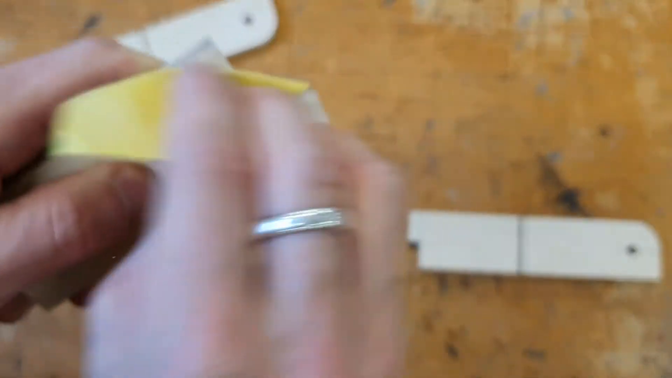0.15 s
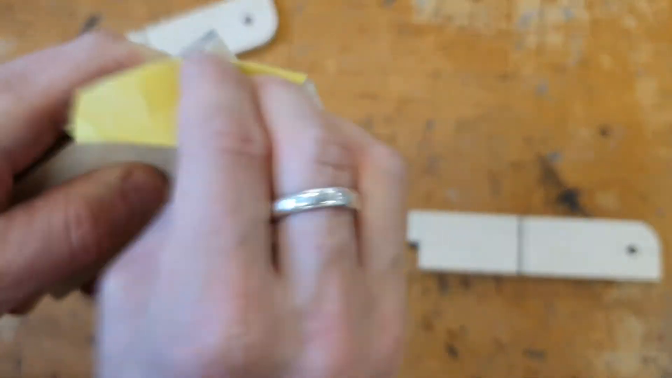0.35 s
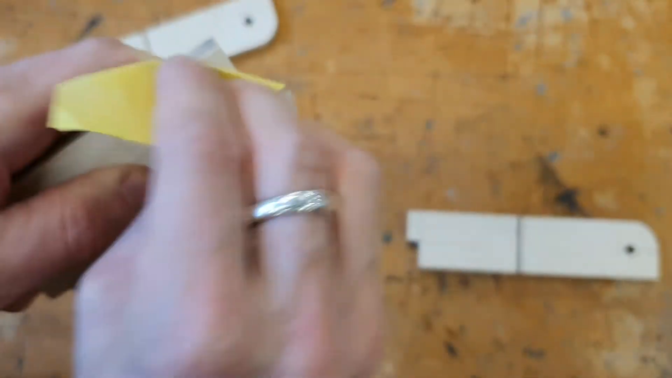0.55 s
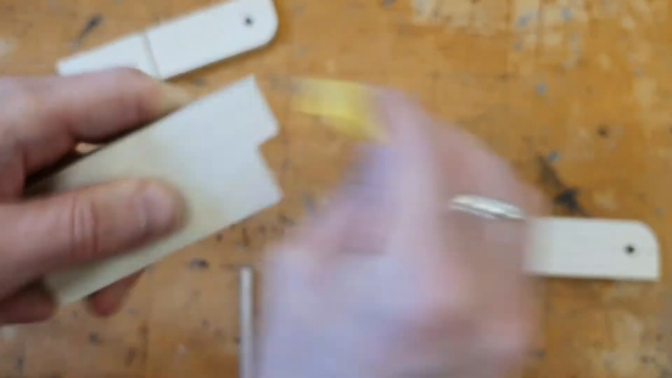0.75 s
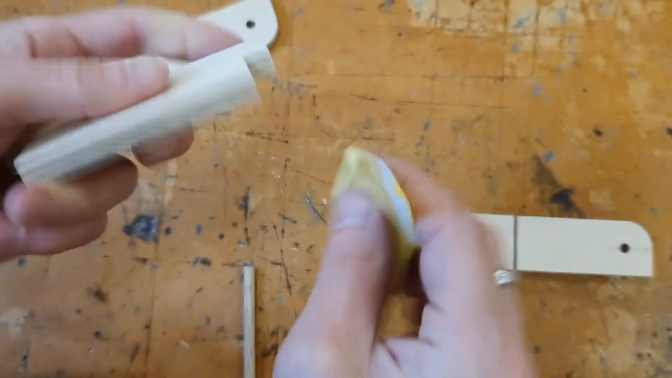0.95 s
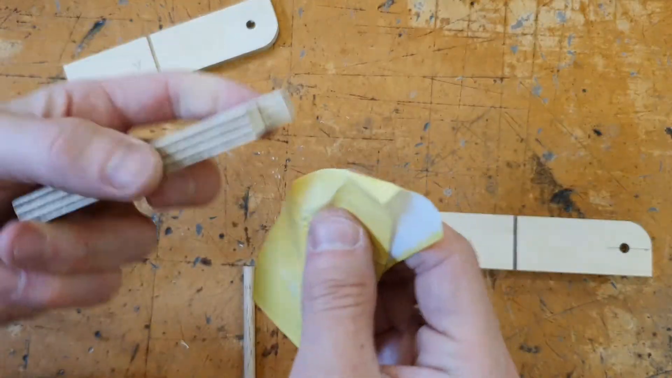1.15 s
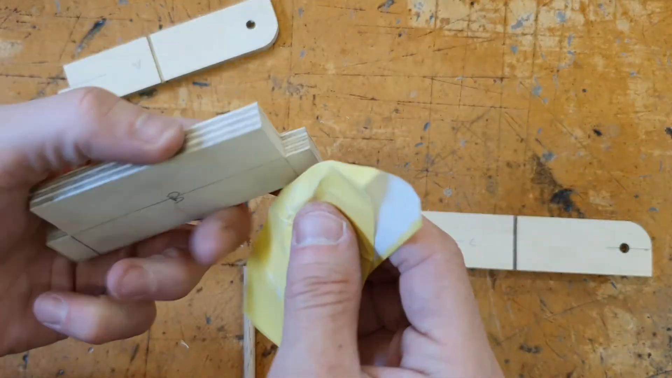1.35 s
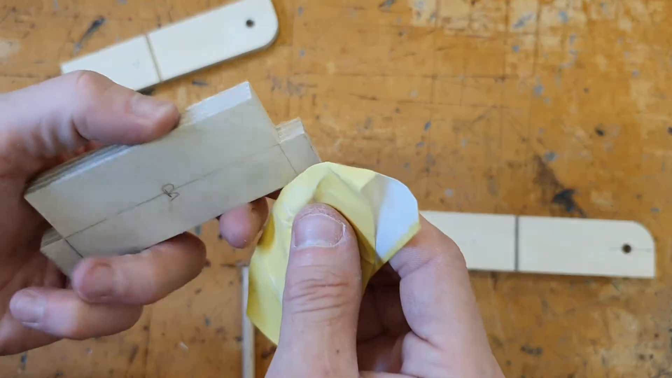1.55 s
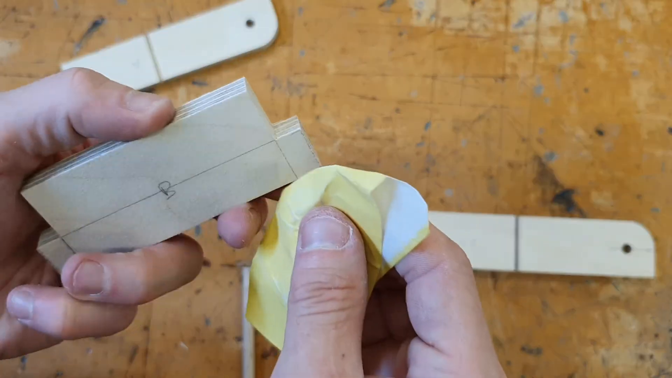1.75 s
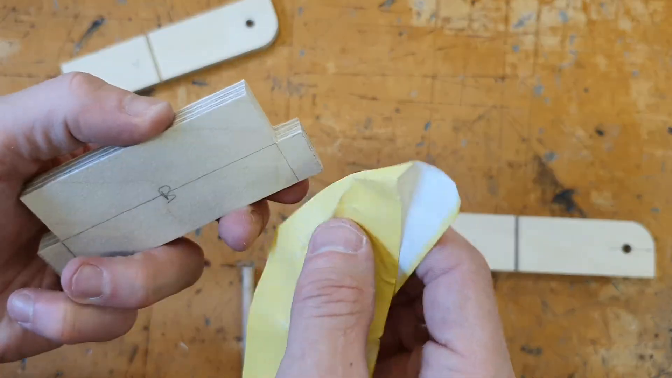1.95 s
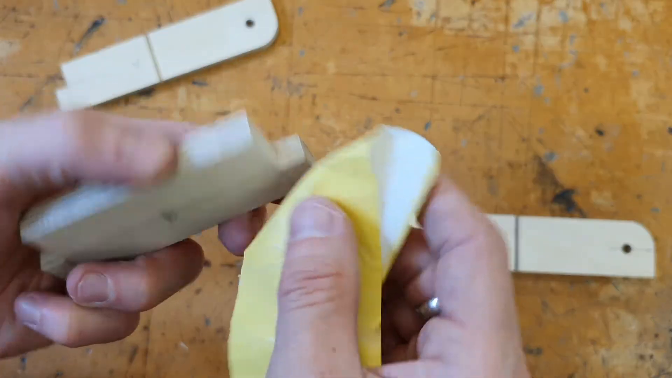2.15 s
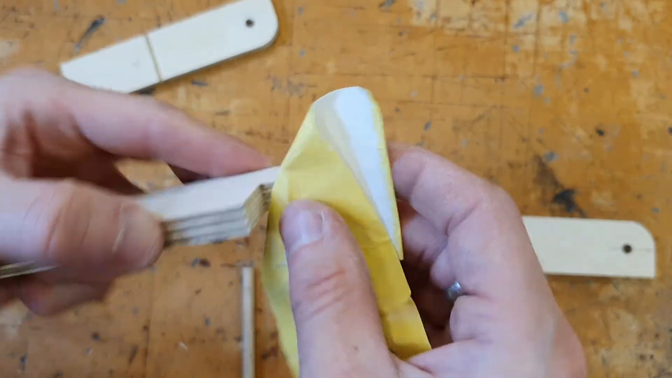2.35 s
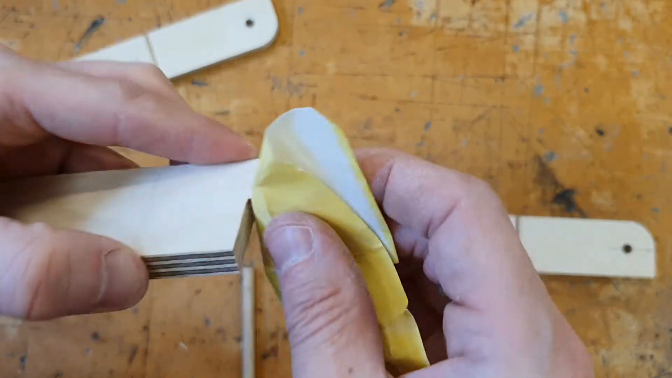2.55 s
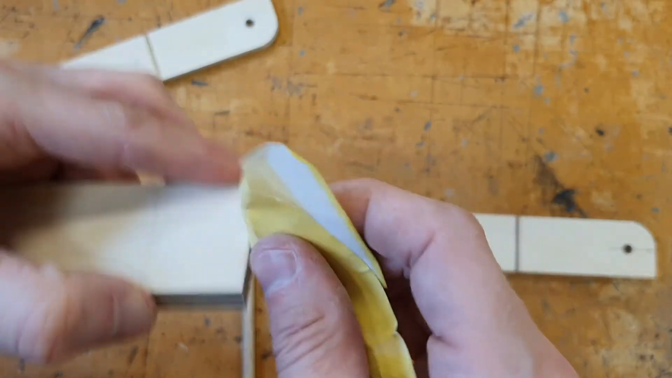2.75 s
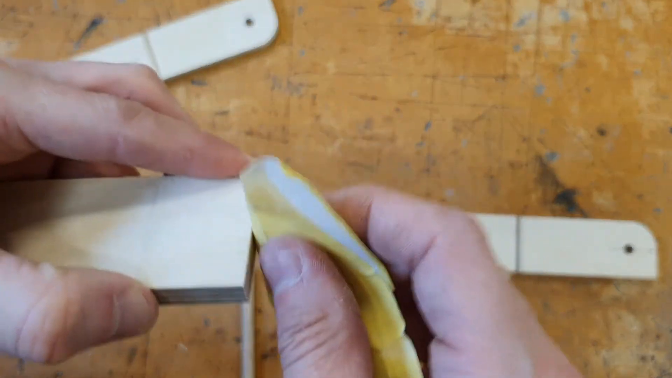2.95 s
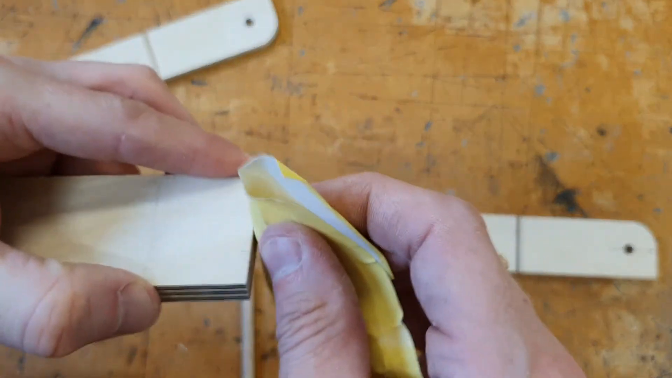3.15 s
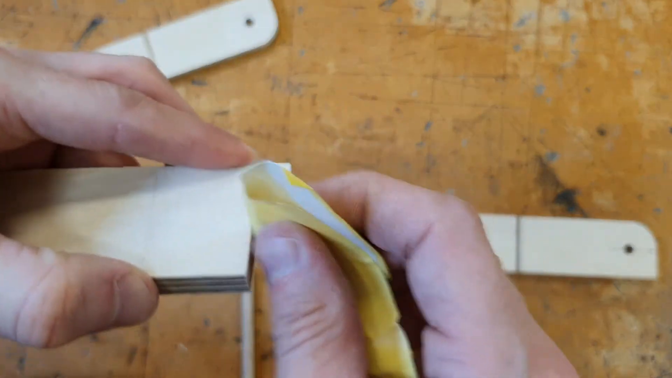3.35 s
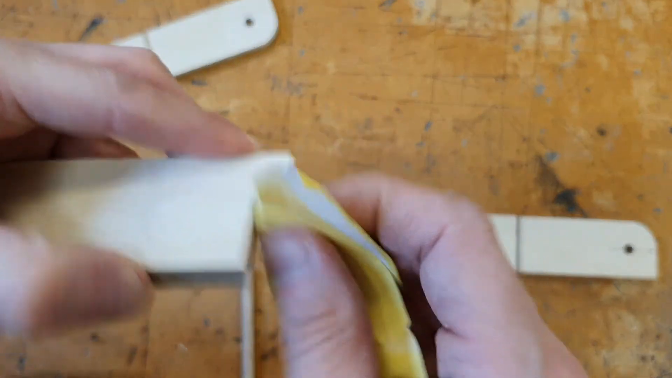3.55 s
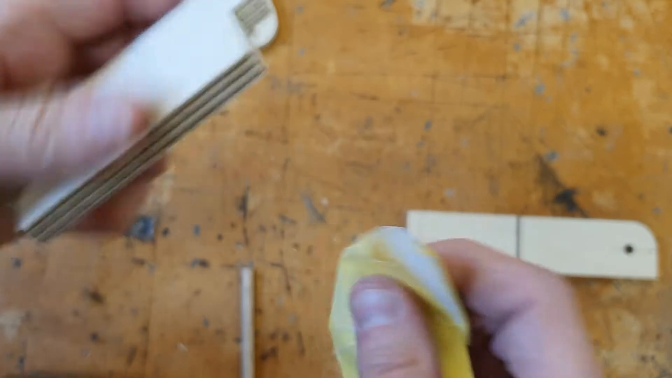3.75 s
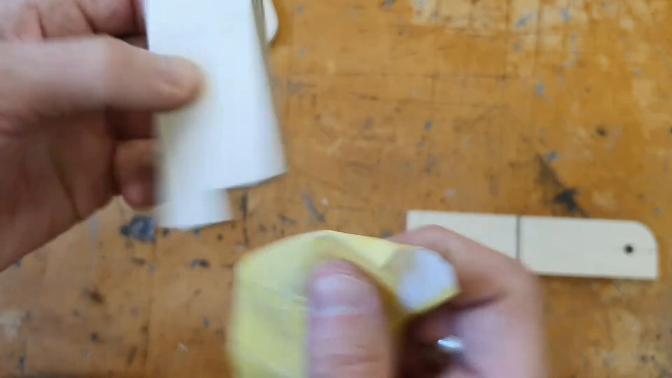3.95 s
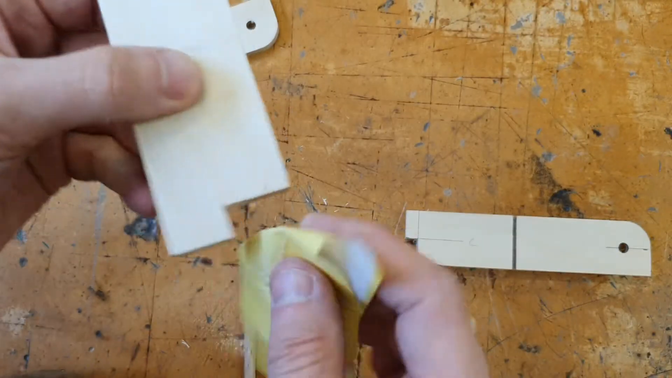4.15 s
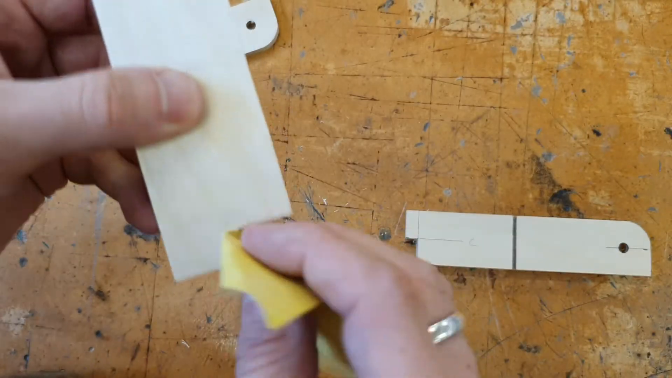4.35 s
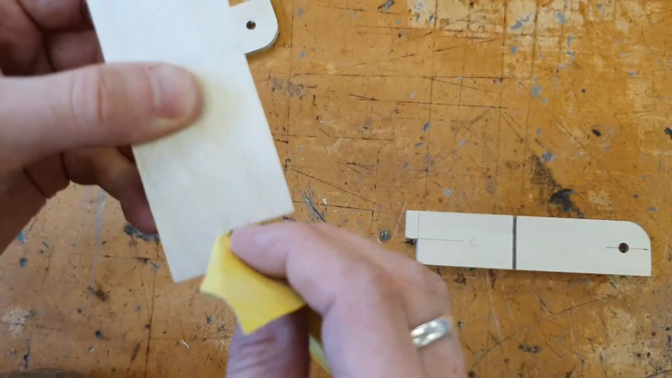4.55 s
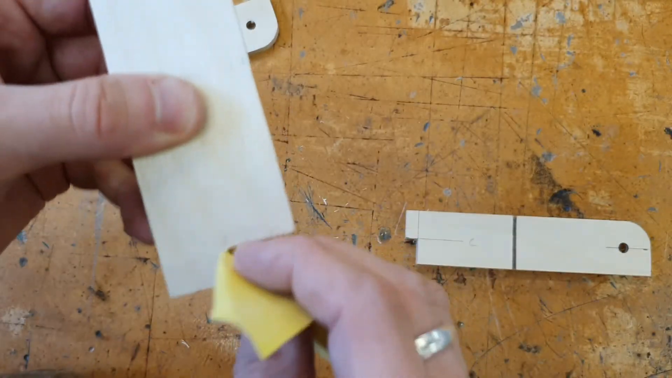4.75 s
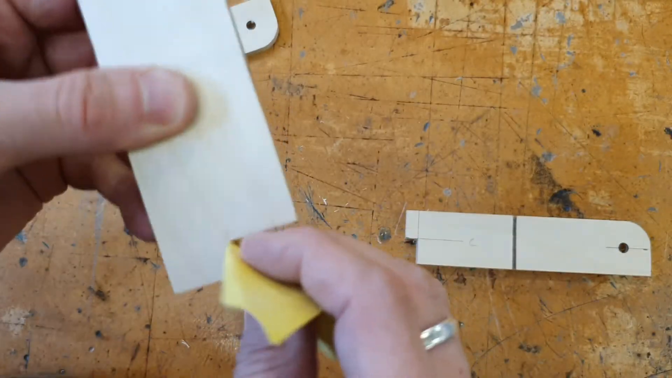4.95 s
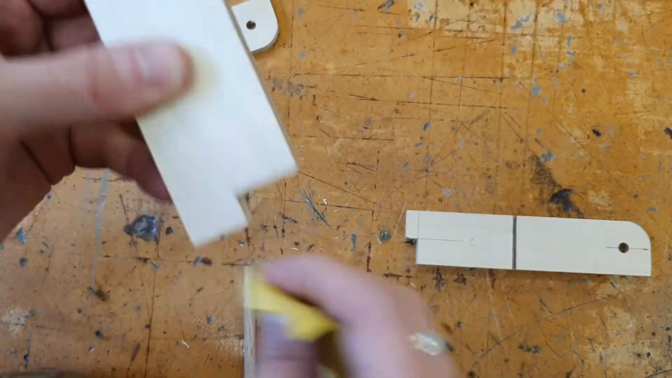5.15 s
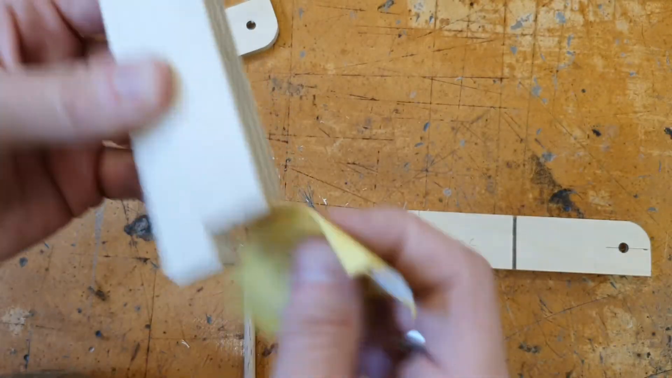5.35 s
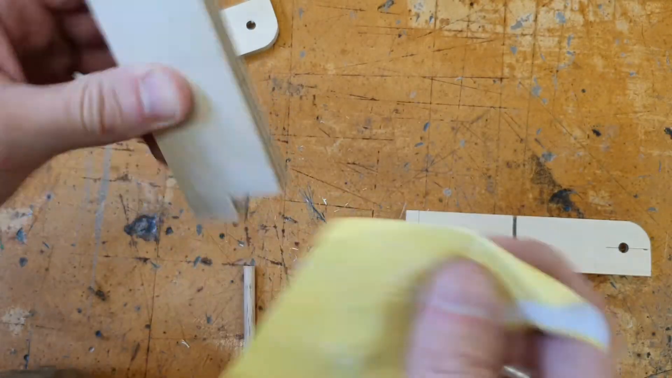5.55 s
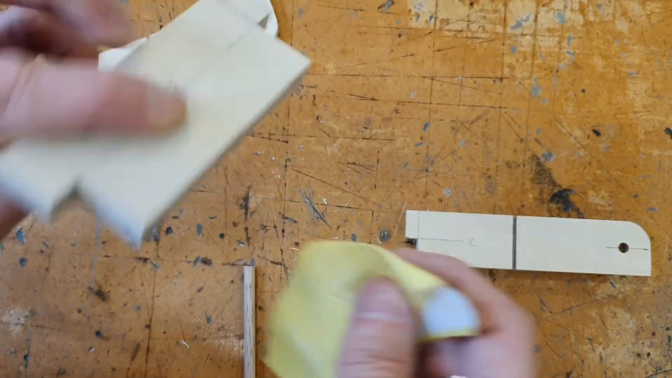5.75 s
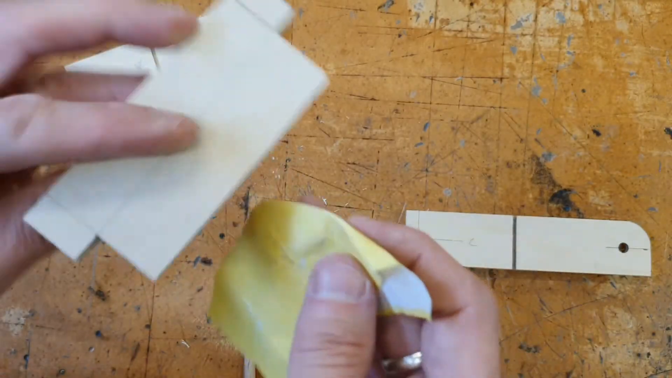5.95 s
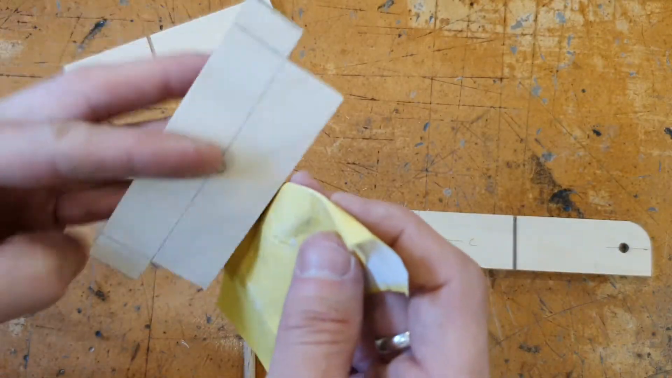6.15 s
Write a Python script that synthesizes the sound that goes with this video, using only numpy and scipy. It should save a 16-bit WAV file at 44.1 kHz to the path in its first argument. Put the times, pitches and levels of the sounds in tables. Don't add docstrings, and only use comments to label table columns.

```python
import sys
import numpy as np
from scipy import signal
from scipy.fft import rfft, irfft
from scipy.io import wavfile
from scipy.ndimage import uniform_filter1d

SR = 44100
rng = np.random.default_rng(int(sys.argv[2]) if len(sys.argv) > 2 else 0)


def dump_mix(stems):
    frames = np.atleast_2d(stems).T
    limited = np.clip(frames, -1, 1)
    pcm = np.round(limited * 32767).astype(np.int16)
    wavfile.write(sys.argv[1], SR, pcm)


def volts_from_decibels(level):
    exponent = np.asarray(level, float) / 20
    return 10 ** exponent


N = 272979
PAD = 32


def evened(x):
    return x / np.sqrt(np.mean(x ** 2) + 1e-20)


def read(points, hz):
    f, value = np.transpose(points)
    return np.interp(np.log(hz + 1), np.log(f + 1), value)


def add(mix, s, sound):
    part = mix[..., max(round(s * SR), 0):][..., :sound.shape[-1]]
    part += sound[..., :part.shape[-1]]


def coloured(x, gain, lead_ms=0.):
    hz = np.fft.rfftfreq(x.shape[-1], 1 / SR)
    lead = np.exp(2j * np.pi * hz * lead_ms / 1000)
    return irfft(rfft(x) * gain(hz) * lead, x.shape[-1])


def mode(centre_hz, width_hz):
    return lambda hz: 1 / (1 + ((hz - centre_hz) / width_hz) ** 2)


# (f/Hz, level/dB per Hz)
AIR_COLOUR = [(22, -17.5), (33, -12.5), (46, 3.5), (85, -6.5), (150, -15.5), (480, -19.5), (570, -29),
              (650, -21), (740, -30), (830, -22), (950, -37), (3500, -43), (7300, -58), (9000, -52.5),
              (15500, -55.5)]
# (t/s, level/dB)
AIR_SWELLS = [(0, -61.5), (.8, -65), (1.15, -54.5), (1.45, -58.5), (2.2, -58.5), (2.55, -66), (3.2, -56),
              (3.8, -66), (4.3, -64), (4.7, -59), (5.4, -58.5), (5.7, -65.5)]
# (f/Hz, likeness 0-1)
AIR_LIKENESS = [(60, 0.97), (290, .82), (640, 0.5), (1400, 0.1)]


def air(patch_db=2.2):
    frames, hz = N // 512 + 5, np.fft.rfftfreq(2048, 1 / SR)
    a, b, c, d, patches = rng.standard_normal((frames, 1025, 5)).T
    patches = uniform_filter1d(uniform_filter1d(patches, size=6, axis=0), size=8, axis=1)
    same = read(AIR_LIKENESS, hz)[:, None]
    left = a + 1j * b
    right = same * left + np.sqrt(1 - same ** 2) * (c + 1j * d)
    shape = volts_from_decibels(read(AIR_COLOUR, hz)[:, None] + patch_db * evened(patches))
    swell_db = np.interp(np.arange(frames) * 512 / SR, *np.transpose(AIR_SWELLS))
    mean_db = swell_db.mean()
    rumble = 1 / (1 + (hz[:, None] / 200) ** 2)
    spectra = np.array([left, right]) * shape * volts_from_decibels(rumble * (swell_db - mean_db))
    noise = signal.istft(spectra, nperseg=2048, noverlap=1536)[1][:, :N]
    return volts_from_decibels(mean_db + 3.5) * evened(noise)


# (f/Hz, t60/s)
SHOP_DECAY = [(200, 0.83), (1000, 0.3), (2500, 0.4), (5000, 0.52), (9000, .5), (12000, .42), (15000, 0.3)]
# (f/Hz, level/dB)
SHOP_COLOUR = [(200, 3.5), (1200, -.8), (1800, -1.2), (2700, -1.2), (3800, -4.5), (5000, -3.5), (9000, -3),
               (15000, -5.5)]


def shop(x, first_ms=4.1):
    taps = np.zeros((2, SR))
    at = np.arange(int(first_ms * SR / 1000), SR - 20, 20)
    at = at + rng.integers(0, 20, (2, len(at)))
    np.put_along_axis(taps, at, rng.choice([-1., 1.], at.shape), 1)
    hz, t, z = signal.stft(taps, SR, nperseg=256)
    decay_db = -60 * t / read(SHOP_DECAY, hz)[:, None]
    tail = signal.istft(z * volts_from_decibels(read(SHOP_COLOUR, hz)[:, None] + decay_db), SR, nperseg=256)[1]
    return signal.fftconvolve(x[None], tail / np.linalg.norm(tail[0]), axes=1)[:, :N]


def uneven(x, patch_db=2.0):
    z = signal.stft(x, nperseg=256)[2]
    patches = rng.standard_normal(z.shape[1:])
    patches = uniform_filter1d(uniform_filter1d(patches, size=5, axis=0), size=5, axis=1)
    return signal.istft(z * volts_from_decibels(patch_db * evened(patches)), nperseg=256)[1][:, :N]


# (until t/s, left over right level/dB, wood leads left by/ms,
# broad rasp hump f/Hz, thud mode f/Hz)
GRIPS = [(.6, -0.5, -.34, 3200, 816), (.95, -1.5, -.34, 3200, 816), (2.62, 10, 0.41, 4200, 1520),
         (3.65, 5.5, 0.41, 3900, 1300), (4.38, 6.5, 0.089, 3500, 1350), (5.04, 1.5, 0.19, 3500, 790),
         (5.3, 0.5, -0.22, 2940, 1520), (5.9, 6, 0.0074, 3400, 1740), (6.3, 8, -0.26, 2600, 1395)]


def grip_number(s):
    return np.searchsorted([grip[0] for grip in GRIPS], s)


def pan_at(s):
    return GRIPS[grip_number(s)][1]


WALLS_DB = [0.1, 0.1, 0.1, 0.1, 0.1, 0.1, 2.2, -3, -1.5]


def echo(rubbing, knocks):
    to_walls_db = np.take(WALLS_DB, grip_number(np.arange(N) / SR))
    sent = volts_from_decibels(to_walls_db) * (rubbing[0] + volts_from_decibels(-5) * knocks[0])
    return volts_from_decibels([[-13], [-15]]) * uneven(shop(sent))


# (f/Hz, left leads by/radians)
PORT_PHASE = [(100, .07), (700, .5), (1500, 1.15), (2300, 1.3), (2950, .3), (3700, -2.1), (5000, -1.9),
              (7000, -1.45), (15000, 4)]


def placed(x, pan_db, lead_ms=None):
    if lead_ms is None:
        far = coloured(x, lambda hz: np.exp(-1j * read(PORT_PHASE, hz)))
    else:
        far = coloured(x, np.ones_like, -lead_ms)
    return np.array([volts_from_decibels(pan_db / 2) * x, volts_from_decibels(-pan_db / 2) * far])


# (t/s, peak level/dB, f/Hz, t60/s)
BUMPS = [(0.201, -49.5, 376, 0.081), (2.24, -51, 252, 0.14), (2.28, -39.5, 122, 0.026),
         (3.328, -50.5, 236, 0.17), (3.826, -48.5, 230, 0.088), (4.103, -40.5, 328, 0.05),
         (4.11, -38, 400, .025), (5.374, -42, 300, .03), (5.39, -38.5, 140, 0.068), (5.49, -28, 250, 0.023),
         (5.5, -34, 160, .04), (5.511, -38, 140, .04)]


def bump(db, hz, t60, rise_s=0.0032):
    t = np.arange(6000) / SR
    swing = np.sin(2 * np.pi * hz * t) * np.minimum(t / rise_s, 1)
    return volts_from_decibels(db - 60 * t / t60) * swing * volts_from_decibels([[2], [-2]])


# (f/Hz, level/dB per Hz)
RASP_COLOUR = [(150, -7.5), (420, -7), (800, -7.5), (1700, -4.5), (2500, -7.5), (5000, -8), (6500, -9),
               (7350, -15), (8200, -10.5), (10000, -13.5), (14000, -16), (15800, -20)]


def rasp_colour(hz):
    return volts_from_decibels(read(RASP_COLOUR, hz))


# (t/s, peak level/dB, ring f/Hz,
# ring t60/s, crack level/dB)
SNAGS_AND_TAPS = [(0.1685, -27, 2060, 0.012, -12), (0.187, -27, 1150, 0.011, -3), (.189, -18, 1600, .009, -6),
                  (0.195, -13.5, 2250, 0.009, -12), (0.197, -20, 2600, 0.007, -9), (0.1988, -11.5, 1900, 0.006, -5),
                  (.2012, -11.5, 1260, .008, -6), (.2015, -19, 5300, .018, -9), (.1955, -21, 3700, .012, -9),
                  (.189, -24, 3600, .012, -4), (0.2025, -14, 3260, 0.014, -8), (0.381, -25, 2350, 0.017, -10.5),
                  (.635, -42, 3000, .008, -2), (.693, -32, 3200, .01, -4), (1.549, -55, 1400, .01, -6),
                  (2.707, -46, 1450, .015, -10), (2.748, -42, 1300, .014, -8), (2.863, -36, 4000, .008, -3),
                  (3.069, -46, 3900, .01, -4), (3.07, -50, 1400, .012, -12), (3.098, -45, 3900, .01, -3),
                  (3.105, -46, 4700, .01, -4), (3.116, -46, 4300, .01, -4), (3.279, -40, 1300, .012, -4),
                  (3.305, -41, 2550, .012, -8), (3.336, -35, 4000, .008, -4), (3.526, -36, 4100, .014, -6),
                  (3.555, -35, 6300, .01, -6),
                  (1.169, -50, 2760, 0.011, -.6), (1.1905, -44, 1600, 0.014, -12), (1.1935, -49, 969, .025, -14),
        (1.293, -51, 1520, 0.017, -4), (1.36, -58, 560, .03, -15), (1.561, -47, 1600, 0.014, -10),
        (1.5655, -37.5, 1540, 0.015, -18), (1.739, -62, 1440, 0.023, -7), (2.28, -65, 1580, 0.02, -7),
        (2.388, -53, 1400, 0.015, -14.5), (2.516, -43, 2227, 0.0053, -15.5), (2.739, -37, 1390, 0.014, -3),
        (3.571, -30, 1675, 0.019, -2.5), (3.576, -29.5, 2200, .01, -3), (4.014, -43, 3730, .015, -3),
        (4.021, -43, 1510, .015, -12), (4.031, -45, 950, .015, -12), (4.039, -36, 1450, 0.028, -12),
        (4.051, -41.5, 1050, .02, -12), (4.059, -45, 1000, .015, -12), (4.066, -41, 1000, .022, -12),
        (4.094, -41, 900, .018, -9), (4.325, -60.5, 1630, 0.016, -19), (4.731, -46, 2400, .01, -3),
        (5.038, -31, 2830, 0.015, -4), (5.039, -33, 1400, .01, -6), (5.076, -30, 2250, .012, -6),
        (5.08, -23, 2940, 0.014, -8), (5.0845, -24, 2900, .014, -8), (5.085, -26.5, 4300, .014, -8),
        (5.079, -27, 1550, .016, -12), (5.109, -36, 2010, 0.018, -13.5), (5.374, -42, 3000, .012, -6),
        (5.491, -27, 900, .012, -12), (5.498, -27, 1900, .008, -6), (6.055, -56.5, 1470, 0.014, -12.5),
        (6.09, -48, 1370, .015, -20), (6.095, -41.5, 1700, .015, -20), (6.1035, -37, 1450, 0.02, -16),
        (6.11, -39, 1500, .018, -14)]


def tap(s, db, hz, t60, crack_db, crack_s=.007, rough=.25):
    t = np.arange(2000) / SR
    wobble, grain = rng.standard_normal((2, len(t)))
    turn = 2 * np.pi * hz * t + rough * evened(uniform_filter1d(wobble, size=40))
    ring = np.sin(turn) + 0.56 * np.sin(.62 * turn)
    crack = evened(coloured(grain, rasp_colour))
    sound = ring * volts_from_decibels(-60 * t / t60) + crack * volts_from_decibels(crack_db - 60 * t / crack_s)
    onset = np.minimum(t / 0.0012, 1)
    return placed(np.pad(volts_from_decibels(db) * sound * onset, (PAD, 0)), pan_at(s))


def grit(n, per_s=12000, spread_db=2.7, chatter_db=2.0, chatter_ms=2.5):
    size = volts_from_decibels(spread_db * np.minimum(rng.exponential(1, n), 5)) * np.sign(rng.standard_normal(n))
    width = int(chatter_ms * SR / 1000)
    chatter = uniform_filter1d(uniform_filter1d(rng.standard_normal(n), width), width)
    return size * (rng.random(n) < per_s / SR) * volts_from_decibels(chatter_db * evened(chatter))


# (from t/s, to t/s, level/dB)
RUSTLES = [(1.156, 1.607, -80.5), (2.098, 2.686, -80.5), (3.6, 3.959, -70), (5.16, 5.38, -70),
           (5.7, 6.12, -87), (6.11, 6.19, -72)]


def rustle(start, end, db):
    n = round((end - start) * SR)
    colour = lambda hz: rasp_colour(hz) * (hz > 2000)
    flecks = [coloured(grit(n, per_s=5500, chatter_db=4.5, chatter_ms=14.0), colour) for _ in range(2)]
    return volts_from_decibels(db) * evened(np.array(flecks)) * signal.windows.tukey(n, .5) * volts_from_decibels([[3.0], [-3.0]])


# (t/s, length/s, level/dB, f/Hz, width/Hz)
SQUEAKS = [(5.46, .04, -42.5, 1900, 400), (5.372, .022, -54, 5000, 250), (4.026, .022, -54, 3750, 200),
           (3.68, .06, -72, 11500, 1200), (.805, 0.037, -69.5, 10500, 900), (1.235, .03, -79, 3780, 120),
           (1.451, .04, -75, 3850, 120), (1.991, 0.074, -77.5, 1415, 150), (2.429, .03, -77, 4540, 300),
           (2.509, 0.076, -71, 2150, 250), (3.683, 0.038, -66, 3850, 101), (4.04, .035, -58, 1000, 250),
           (5.67, .07, -72, 3800, 200), (6.088, .04, -51, 1450, 350), (5.092, .014, -40, 7000, 1500),
           (5.078, .014, -42, 6500, 400), (4.1, .02, -52.5, 950, 250), (4.221, 0.068, -75, 2320, 80),
           (6.092, .028, -50, 3300, 500), (6.095, .025, -60, 8600, 700), (5.462, .035, -42, 8200, 600)]


def squeak(s, length, db, hz, width_hz):
    n = round(length * SR)
    narrow = coloured(grit(n), mode(hz, width_hz))
    return placed(volts_from_decibels(db) * evened(narrow) * np.hanning(n), pan_at(s))


# (t/s, length/s, level/dB, from f/Hz, to f/Hz)
SLIDES = [(5.44, .03, -37, 5100, 4700), (5.458, .042, -36, 4200, 2400), (.206, .022, -40, 3500, 3200),
          (.392, .04, -38, 3400, 3750), (.288, .042, -41, 3000, 2780), (.495, .04, -43, 2850, 2900),
          (2.935, .065, -54, 2500, 2600), (2.98, .025, -49, 4100, 4100), (.378, .02, -40, 2100, 2700),
          (.376, .02, -39, 3400, 3600), (2.84, .035, -52, 4300, 3800), (3.19, .04, -51, 3300, 4100),
          (3.585, .025, -62, 5600, 6000), (.64, .06, -48, 2800, 3500), (5.035, .045, -48, 2900, 2950)]


def slide(s, length, db, from_hz, to_hz, width_hz=260):
    n = round(length * SR)
    turn = np.exp(2j * np.pi * np.cumsum(np.geomspace(from_hz, to_hz, n)) / SR)
    r = np.exp(-np.pi * width_hz / SR)
    slow = signal.lfilter([1], [1, -2 * r, r * r], grit(n) / turn)
    narrow = (turn * slow / np.sqrt(abs(slow) + 1e-9)).real
    return placed(volts_from_decibels(db) * evened(narrow) * np.hanning(n), pan_at(s))


def hand(t, length, peak_db, place, rule):
    rise_db, fall_db, bend, land_s, lift_s = rule
    off = (t - place * length) / .05
    db = peak_db - np.where(off < 0, rise_db, fall_db) * abs(off) ** bend
    edges = np.clip(np.minimum(t / land_s, (length - t) / lift_s + .5), 0, 1)
    return uniform_filter1d(volts_from_decibels(db), size=60) * edges


# (paper hiss level/dB, singing wood mode on the push f/Hz,
# on the pull f/Hz, its level/dB, change of the thud along a stroke/dB)
GRIP_VOICES = [(-3.5, 2820, 3650, -7, -4.5), (1, 3800, 3680, -4, 6), (-5, 4950, 3870, -2, -3),
               (-6.5, 2690, 3750, -1.5, -4), (-4, 2560, 3900, -3, 3.5), (-3, 3700, 8300, -0.7, -1),
               (-5, 2330, 2600, 7, 4.5), (-5.5, 2900, 3200, -6, 13), (-6, 2000, 1590, 7, -4)]


def stroke(start, length, peak_db, place, wood_db, rule, paper_db=None, pull=False, drag_db=0,
           wood_share=0.28, thud_same=0.73, rasp_same=0.29, hiss_same=0.23):
    t = np.arange(0, length + rule[-1] / 2, 1 / SR)
    number = grip_number(start)
    _, pan_db, wood_ms, hump_hz, thud_hz = GRIPS[number]
    hiss_db, push_hz, pull_hz, sing_db, change_db = GRIP_VOICES[number]
    hiss_db = hiss_db + drag_db if paper_db is None else paper_db
    thud_db = wood_db + change_db * (t / length - .5)

    wood, paper, far_edge = (coloured(grit(len(t)), rasp_colour) for _ in range(3))
    judder = coloured(grit(len(t), 2500, 2.9, 1.8, 5.0), rasp_colour)
    pressure = hand(t, length, peak_db, place, rule)

    def part(x, keep, gain, lead_ms):
        return placed(np.pad(pressure * gain * evened(coloured(x, keep)), PAD), pan_db, lead_ms)

    def wide(x, keep, gain, same):
        near = part(x, keep, gain, None)
        other = part(far_edge, keep, gain, 0)
        return [[1], [same]] * near + [[0], [np.sqrt(1 - same ** 2)]] * other

    low = lambda hz: 1 / (1 + (hz / 1800) ** 4)
    high = lambda hz: 1 / (1 + (6500 / (hz + 1)) ** 16)
    middle = lambda hz: (1 - low(hz) - high(hz)) * (1 + 0.7 * mode(hump_hz, 900)(hz))
    body = lambda hz: low(hz) * (1 + 0.4 * mode(thud_hz, 180)(hz))

    rasp = part(wood, middle, np.sqrt(wood_share), wood_ms)
    rasp = rasp + wide(paper, middle, np.sqrt(1 - wood_share), rasp_same)
    sing_gain = volts_from_decibels(min(sing_db, 6.0) - 12.5) * pressure / pressure.max()
    sing = part(wood, mode(pull_hz if pull else push_hz, 200), sing_gain, wood_ms)
    thud = wide(judder, body, volts_from_decibels(thud_db), thud_same)
    hiss = wide(paper, high, volts_from_decibels(hiss_db), hiss_same)
    return start - PAD / SR, rasp + sing + thud + hiss


# (t/s, length/s, peak level/dB, thud over rasp/dB, hiss over rasp/dB)
BRUSHES = [(.001, 0.093, -65.5, -18, -6.5), (.168, .022, -56, -8, -2), (.555, 0.02, -62, -8, -2),
           (1.351, 0.015, -74, 10, -13), (1.451, 0.022, -76, 2.5, -11), (1.981, .08, -69, -9, 3.5),
           (2.221, 0.071, -86, 2.5, 0), (2.424, 0.033, -79, 3, -2), (2.49, 0.032, -70, 3.5, -8),
           (2.59, .05, -65, 0, -7), (3.69, 0.032, -77, -28, 9.5), (3.743, .03, -76.5, -22, -1.5),
           (3.96, 0.08, -66, -15.5, -4.5), (4.237, 0.019, -73, 6, -12), (4.417, .016, -60, -1.5, -7.5),
           (4.908, 0.018, -57.5, -.6, -2.5), (5.388, .046, -62, -8, -3)]
# (gain over 50 ms before the peak/dB, loss over 50 ms after/dB, bend, landing/s, lifting/s)
BRUSH_HAND = (8, 5, 1.5, .014, 0.012)


def brushes(mix):
    for start, length, peak_db, wood_db, paper_db in BRUSHES:
        add(mix, *stroke(start, length, peak_db, .55, wood_db, BRUSH_HAND, paper_db))


# (t/s, length/s, peak level/dB, place of peak 0-1, thud over rasp/dB)
JABS = [(0.082, .043, -49, .3, -8.5), (0.185, .009, -38, .4, -3), (.196, .047, -33.5, .35, -11),
        (1.555, .027, -62, .5, 2.5), (2.279, 0.018, -63, .15, 5.5), (2.51, .015, -55.5, .25, -3),
        (3.067, .01, -51, .2, -9), (3.082, 0.012, -51.5, .2, 0.5), (4.089, 0.023, -56.5, .7, 2),
        (4.439, .014, -48.5, .25, -10), (5.372, .02, -49, .15, -5)]
JAB_HAND = (35, 20, 0.93, .004, 0.0043)


def jabs(mix):
    for row in JABS:
        add(mix, *stroke(*row, JAB_HAND, pull=True, drag_db=-2))


# (t/s, length/s, peak level/dB, place of peak 0-1, thud over rasp/dB)
SWEEPS = [(2.647, 0.043, -53, 0.45, -10), (2.704, 0.056, -51.5, 0.73, -3), (2.933, 0.072, -42, 0.79, -9),
          (3.096, 0.037, -54, 0.3, -6), (3.171, .058, -45.5, 0.75, -11), (3.275, .021, -46, .25, -5.5),
          (3.299, 0.067, -43.5, 0.46, -8), (3.388, 0.066, -46.5, .65, -9.5), (3.512, 0.067, -38, 0.6, -18),
          (3.825, 0.056, -60.5, 0.15, 0), (4.013, 0.06, -52.5, .25, 0), (4.466, 0.03, -55.5, 0.07, -1.5),
          (4.52, 0.035, -58.5, 0.08, -1.5), (4.636, 0.06, -54, 0.4, -5), (4.857, 0.045, -44.5, 0.3, -6.5),
          (5.072, .033, -36.5, .5, -12)]
SWEEP_HAND = (8, 10, 1, .006, 0.004)


def sweeps(mix):
    for k, row in enumerate(SWEEPS):
        add(mix, *stroke(*row, SWEEP_HAND, pull=k % 2 == 0))


# (t/s, length/s, peak level/dB, place of peak 0-1, thud over rasp/dB)
SWINGS = [(.148, 0.027, -43.5, 0.8, -10), (.264, 0.081, -37.5, 0.58, -11.5),
          (.364, 0.069, -34.5, 0.42, -14), (.452, 0.084, -39, 0.59, -13.5), (.628, 0.076, -40.5, 0.78, -14),
          (4.723, 0.078, -46, 0.66, -8), (5.428, .073, -32.5, .72, -11), (4.962, 0.12, -39, 0.43, -10.5),
          (2.811, .075, -43, .62, -10), (6.086, .036, -60, .6, -8)]
SWING_HAND = (14, 12, 1.2, .009, .009)


def swings(mix):
    for k, row in enumerate(SWINGS):
        add(mix, *stroke(*row, SWING_HAND, pull=k % 2 == 0))


def scene():
    rubbing, knocks = np.zeros((2, 2, N))
    for play in (swings, sweeps, jabs, brushes):
        play(rubbing)
    rubbing = uneven(rubbing)
    for row in RUSTLES:
        add(rubbing, row[0], rustle(*row))
    for row in SQUEAKS:
        add(rubbing, row[0], squeak(*row))
    for row in SLIDES:
        add(knocks, row[0], slide(*row))
    for row in SNAGS_AND_TAPS:
        add(knocks, row[0] - PAD / SR, tap(*row))
    for s, *row in BUMPS:
        add(knocks, s, bump(*row))
    return air() + echo(rubbing, knocks) + knocks + rubbing


# (f/Hz, level/dB)
LEFT_BIAS = [(100, 3), (3500, 3), (8000, 5.5), (11000, 7.5), (15000, 5)]


def microphone(dry):
    band = lambda hz: 1 / (1 + (37 / (hz + 1)) ** 6) / (1 + (hz / 15930) ** 240)
    return coloured(dry, lambda hz: band(hz) * volts_from_decibels(np.outer([.5, -.5], read(LEFT_BIAS, hz))))


def roll_off(x):
    return signal.sosfilt(signal.butter(12, 16020, fs=SR, output="sos"), x)


def record(dry):
    return roll_off(microphone(dry))


dry = scene()
out = record(dry)
dump_mix(out)
```